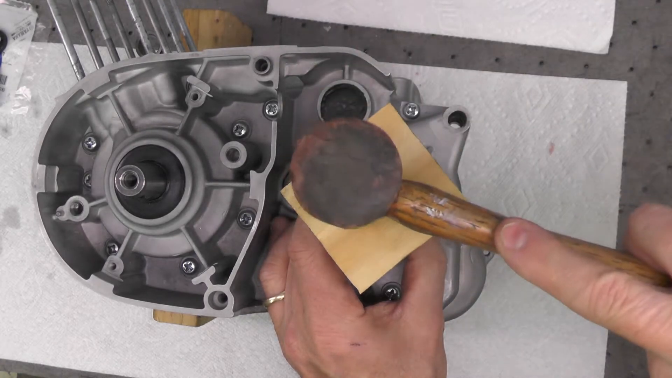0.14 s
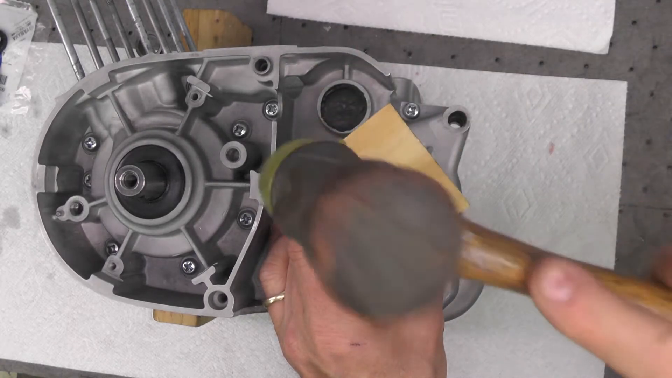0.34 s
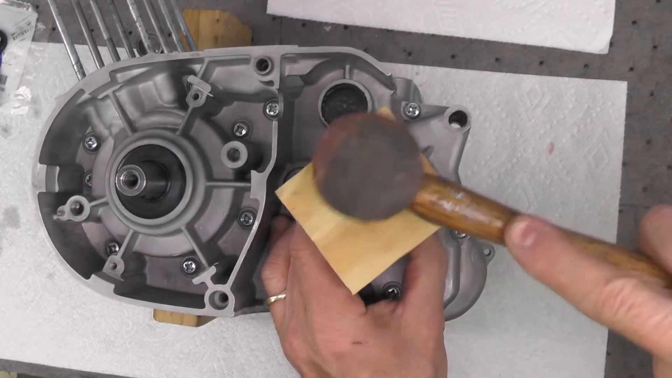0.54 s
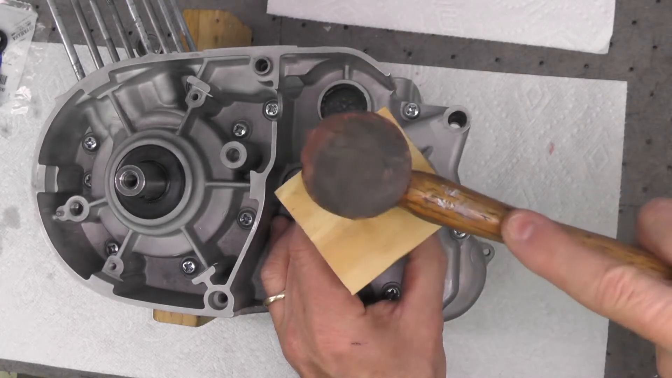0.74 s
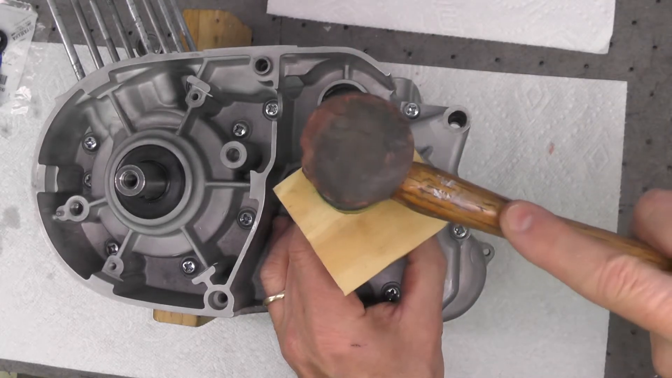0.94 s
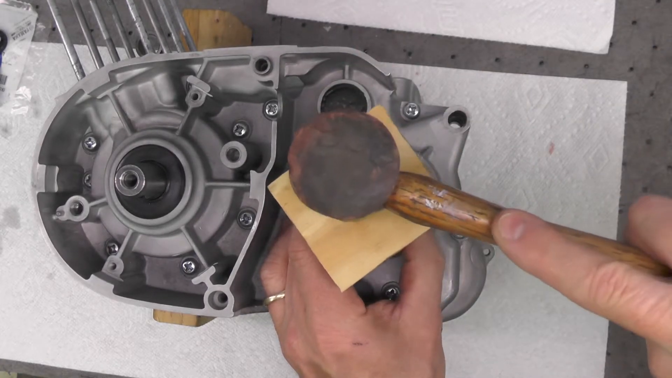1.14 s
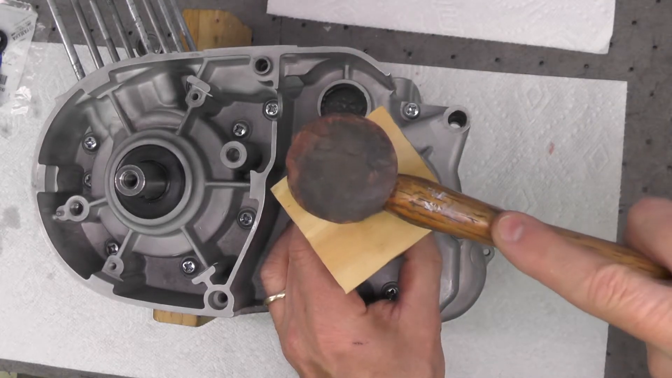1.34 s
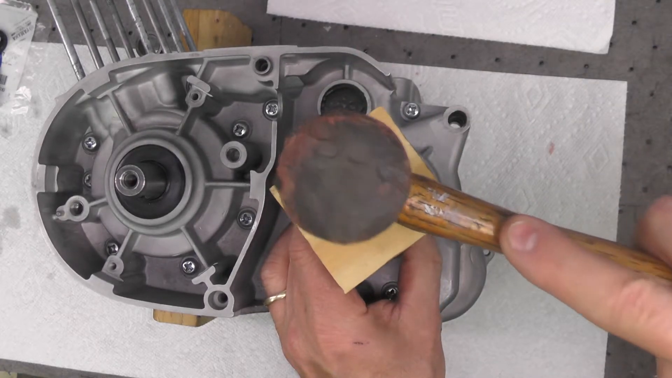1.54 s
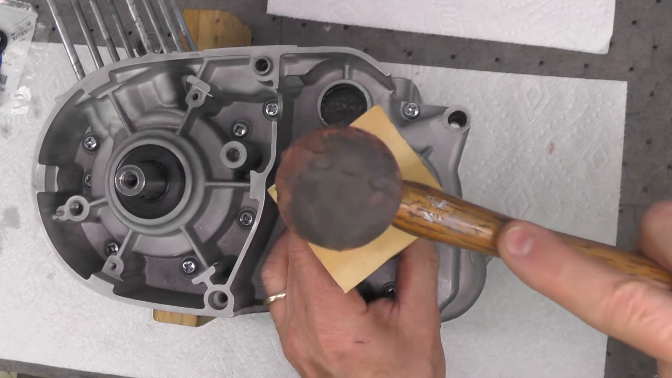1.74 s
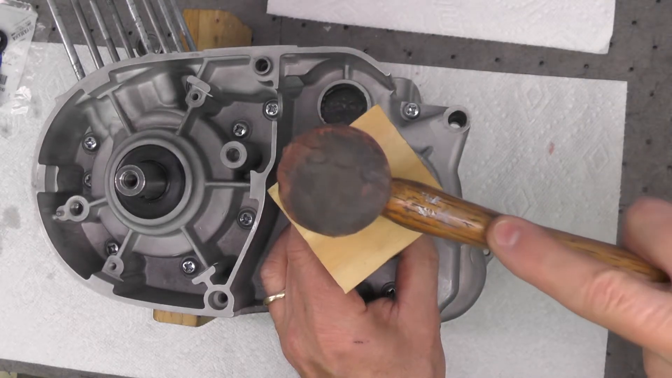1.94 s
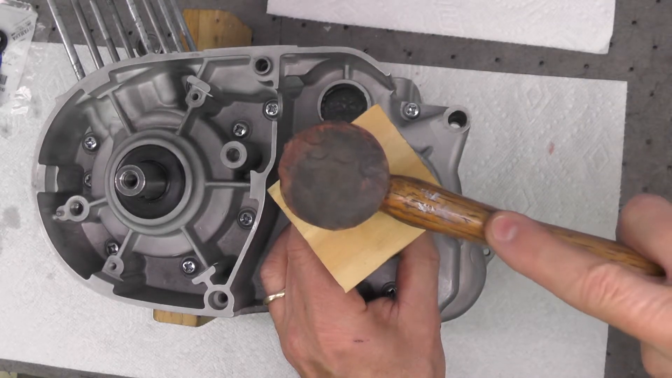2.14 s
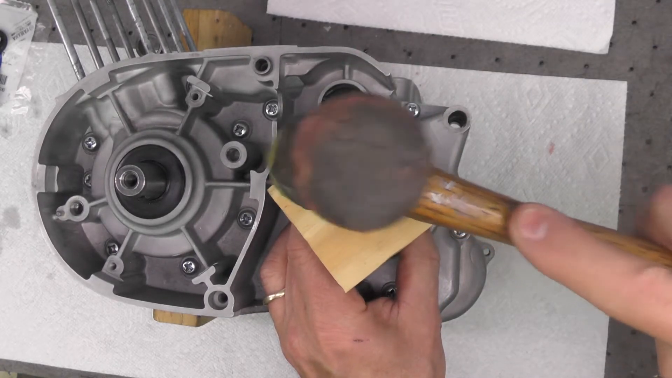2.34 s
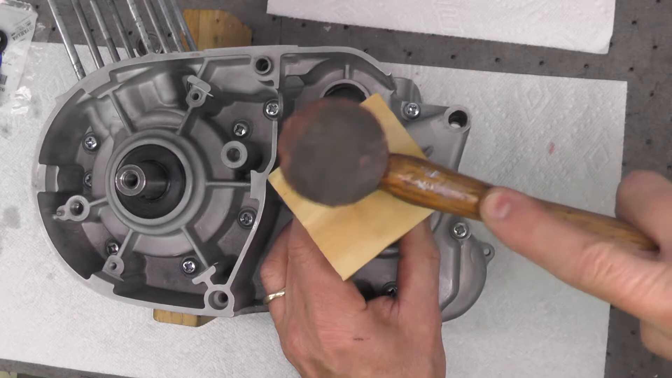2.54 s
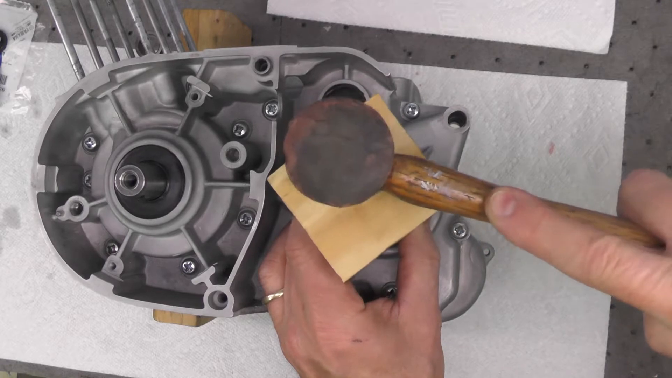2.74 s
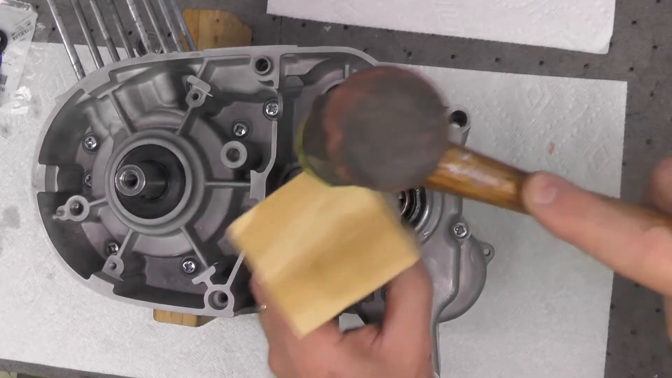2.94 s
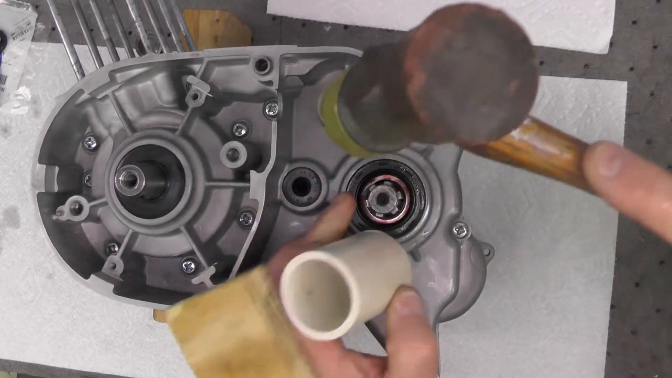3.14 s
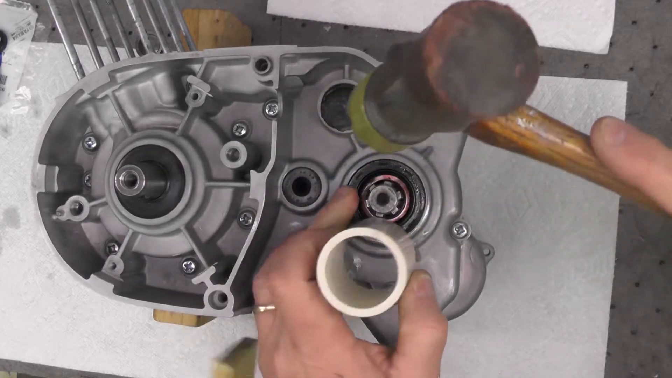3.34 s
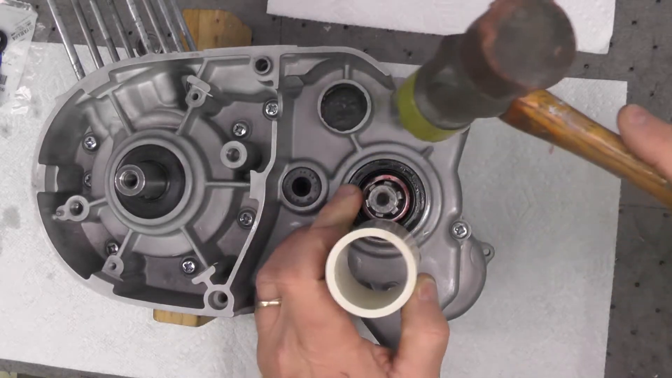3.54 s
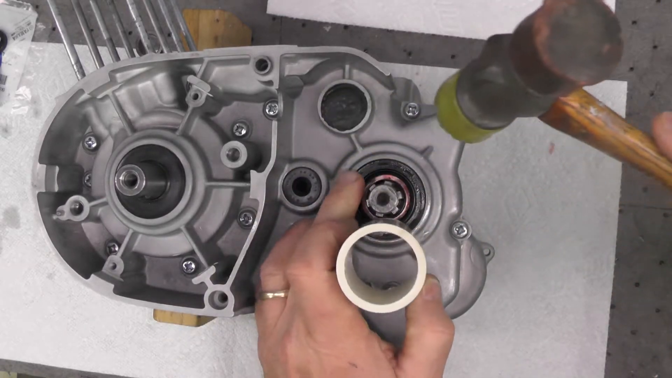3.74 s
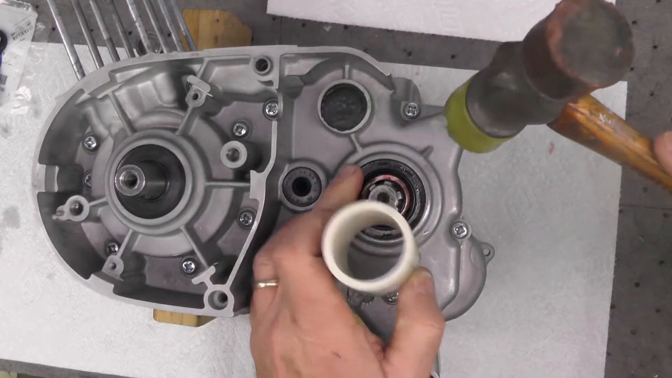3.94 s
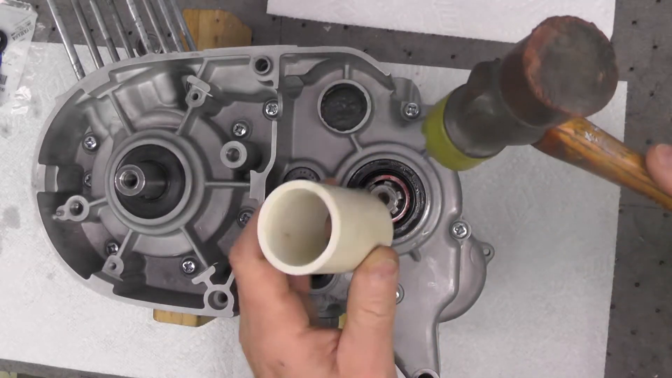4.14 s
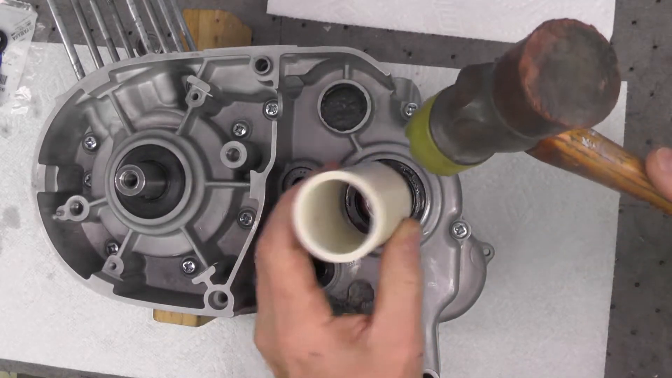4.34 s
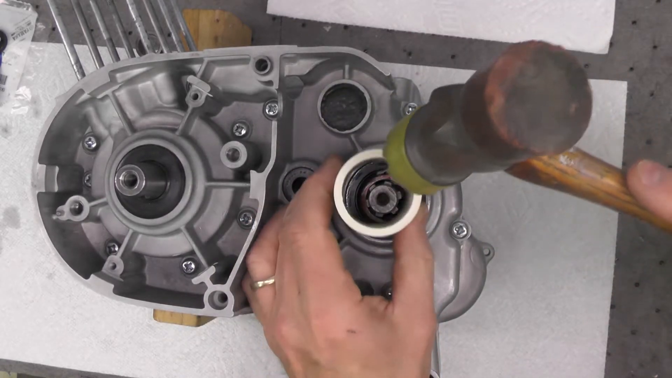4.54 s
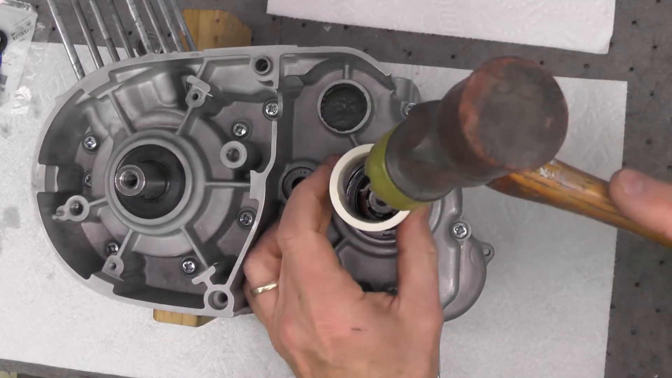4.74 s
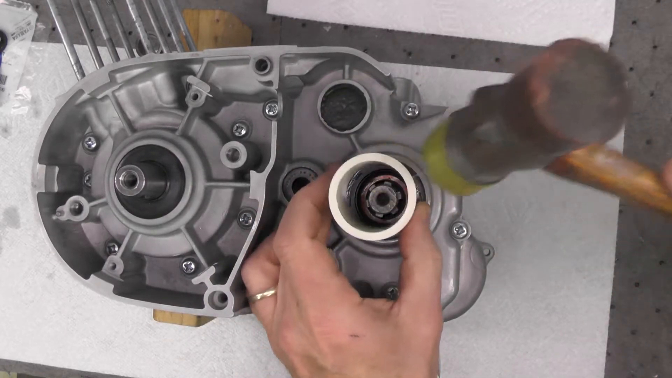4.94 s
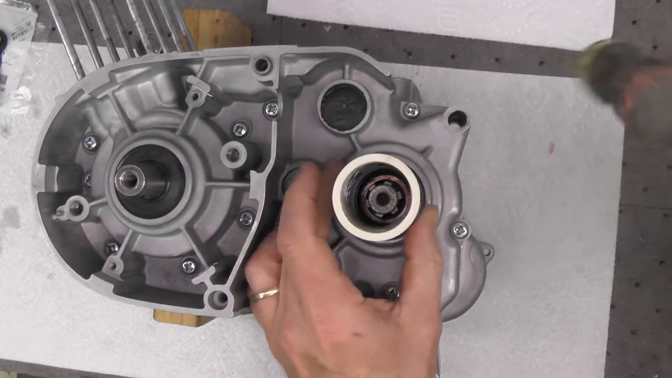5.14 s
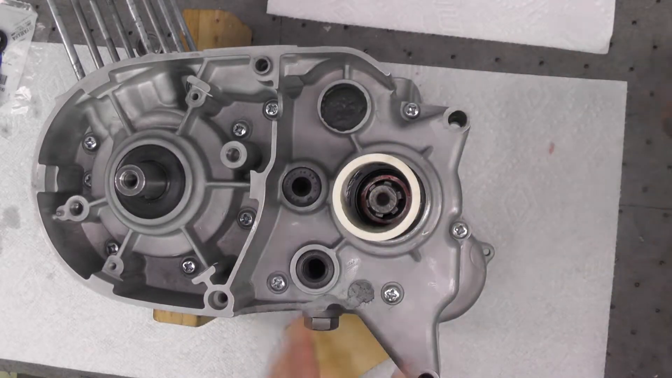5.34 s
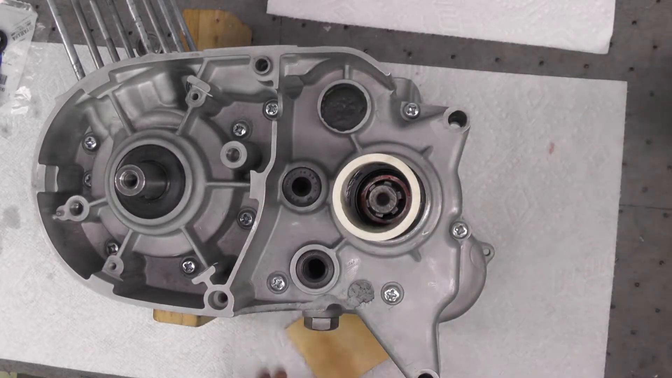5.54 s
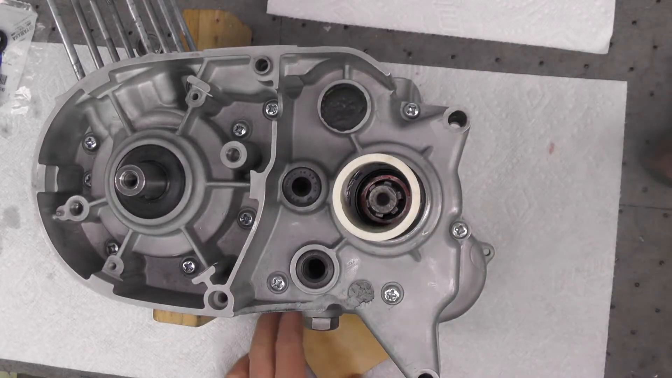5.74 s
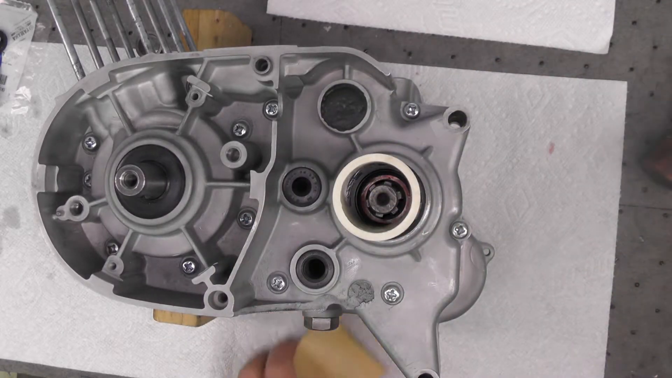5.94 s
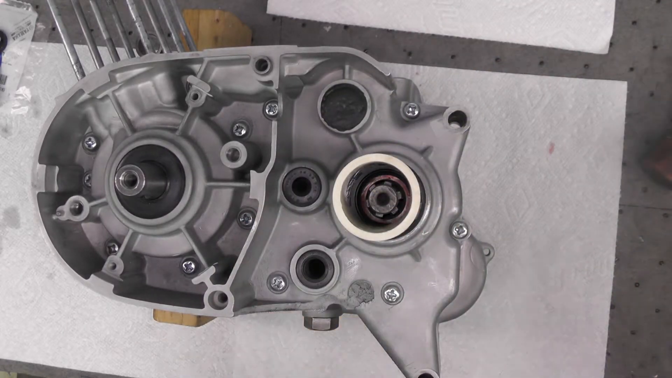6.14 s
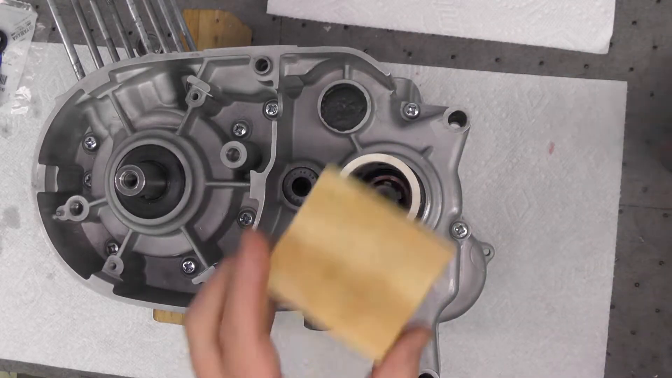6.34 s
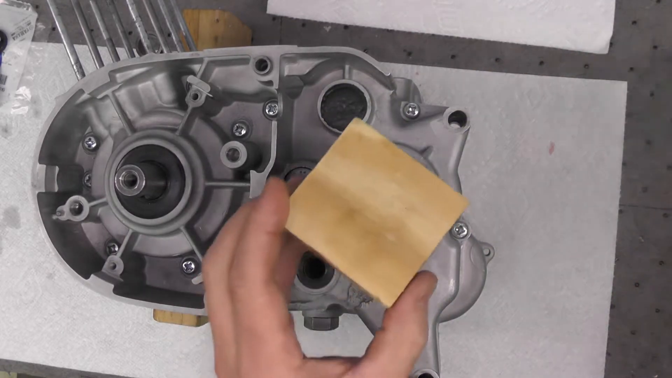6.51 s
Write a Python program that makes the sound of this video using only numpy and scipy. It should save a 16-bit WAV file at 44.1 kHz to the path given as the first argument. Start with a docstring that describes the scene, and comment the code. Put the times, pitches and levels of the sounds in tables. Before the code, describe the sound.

In a workshop, a mallet taps a wood block resting on a plastic pipe, then strikes hard, making a metal engine case ring and the bench boom. Several lighter taps lead to a second hard blow. The block scrapes off, clacks against the bench and slaps onto the floor. Small clicks, faint rubbing and a dull knock follow. The sounds are close, with a short room echo, over a quiet hum and faint clock ticking.

```python
"""A mallet drives a seal into an aluminium engine case through a wood block and a plastic pipe.
Light aiming taps come before two hard blows: the seal slips in jerks, the case rings, the bench booms.
The block slides off the pipe, clips the bench and slaps onto the floor. The pipe clicks and hisses as
it is lifted and set back, the case rocks, and wood scuffs over paper.
Behind it all, a clock ticks over the hum of the workshop's air and motors."""
import sys
import numpy as np
from scipy import signal
from scipy.fft import rfft, irfft
from scipy.io import wavfile

SR = 44100
rng = np.random.default_rng(int(sys.argv[2]) if len(sys.argv) > 2 else 0)


def file_out(sig):
    """Save sig as 16-bit WAV at sys.argv[1]."""
    # one column per channel
    cols = np.atleast_2d(sig).T
    # limit, then scale
    lim = np.clip(cols, -1, 1)
    pcm = np.round(lim * 32767).astype(np.int16)
    wavfile.write(sys.argv[1], SR, pcm)


N = 289945
T = np.arange(2 ** 15) / SR  # the time one hit lasts, in seconds
HZ = np.fft.rfftfreq(len(T), 1 / SR)  # the frequencies in one hit

# hollow notes of the block and pipe: f/Hz, level/dB, t60/s (the time to fade by 60 dB)
STACK_NOTES = [(411, -27.5, 0.046), (654, -39.5, 0.081), (785, -39, 0.11), (1340, -29, 0.019),
               (1612, -29.5, 0.024), (2620, -32, 0.026), (3560, -39.5, 0.032)]


def amp(db):
    """Turns decibels into a gain."""
    return 10 ** (np.asarray(db) / 20)


def read(points, hz=HZ):
    """Reads between the rows of a table, on a scale of octaves."""
    f, value = np.transpose(points)
    return np.interp(np.log(hz + 1), np.log(f + 1), value)


def add(mix, s, sound):
    """Lays a sound into the mix at s seconds."""
    part = mix[:, max(round(s * SR), 0):][:, :sound.shape[-1]]
    part += sound[..., :part.shape[1]]


def noise(gain_db, side_db, size=len(T)):
    """Noise with a chosen tone; a higher side_db makes left and right less alike."""
    # left-right difference, before side_db is added: f/Hz, level/dB
    width = [(60, -17), (110, -18.5), (200, -10), (380, -16), (700, -12.5), (1290, -14.5), (2380, -18),
             (4400, -19), (8120, -12.5), (15000, -5.5)]
    hz = np.fft.rfftfreq(size, 1 / SR)
    spectra = rfft(rng.standard_normal((2, size))) * amp(gain_db)
    mid = irfft(spectra[0], size)
    side = irfft(spectra[1] * amp(side_db + read(width, hz)), size)
    return mid + np.array([side, -side])


def fade(t60, rise=.0002):
    """Swells over about rise seconds and dies by 60 dB in t60 seconds."""
    return amp(-60 * T / t60) * (1 - np.exp(-T / rise))


def ring(notes, rise=.0001):
    """The fading notes of a struck object; neighbours start in opposite directions."""
    return sum((-1) ** k * amp(db) * fade(t60, rise) * np.sin(2 * np.pi * hz * T)
               for k, (hz, db, t60) in enumerate(notes))


def burst(tone, t60, rise=.0002):
    """Notes too crowded to tell apart, dying together; tone lists f/Hz, level/dB."""
    return noise(read(tone), side_db=-2) * fade(t60, rise)


def room(gain_db, rise):
    """The walls return a wide wash of echoes; the treble dies first."""
    # how long the echoes last: f/Hz, t60/s
    echo_times = [(90, 0.54), (250, .65), (600, 0.71), (1500, 0.68), (4000, 0.69), (6000, 0.54),
                  (8000, .36), (12000, 0.085), (16000, .2)]
    hz, t, spectra = signal.stft(noise(gain_db, side_db=5), SR, nperseg=256)
    decay = amp(-60 * t / read(echo_times, hz)[:, None])
    tail = signal.istft(spectra * decay, SR, nperseg=256)[1][:, :len(T)]
    return tail * (1 - np.exp(-T / rise))


def workshop_hum():
    """Moving air rushes, and motors hum with a slightly wandering pitch."""
    # ventilation: f/Hz, level/dB
    air_tone = [(25, -55), (150, -56), (310, -50), (520, -54.5), (780, -55), (910, -61), (1250, -55),
                (1600, -63.5), (1950, -61), (2400, -65.5), (3000, -62.5), (4700, -65), (6600, -74),
                (15500, -74)]
    # motor notes: f/Hz, level/dB (rms)
    motors = [(106.5, -68), (120, -66), (246.8, -73.5), (333, -81.5), (1266, -80), (1911, -84)]
    t = np.arange(N) / SR
    out = noise(read(air_tone, np.fft.rfftfreq(N, 1 / SR)), side_db=0, size=N)
    for hz, db in motors:
        waver = np.interp(t, np.linspace(0, t[-1], 40), rng.standard_normal(40))
        turns = np.cumsum(hz * (1 + .0035 * waver)) / SR + rng.random()
        out += np.sqrt(2) * amp(db) * np.sin(2 * np.pi * turns)
    return out


def aiming_taps():
    """The mallet taps and rests on the block, cutting the ringing short; slower contact is duller."""
    # taps: t/s, level/dB, treble cutoff/Hz, bench thump/dB
    taps = [(.0005, -3, 1097, -34), (1.205, -19, 750, -62), (1.332, -16.5, 650, -43.5),
            (1.845, -7.5, 480, -58), (2.183, 0.5, 3200, -32), (2.2199, -9.5, 1604, -50)]
    # air ringing on in the pipe: f/Hz, level/dB, t60/s
    pipe_air = [(424, -33, .12)]
    # a tap's echo: f/Hz, level/dB
    echo_tone = [(100, -39.5), (400, -33), (1000, -49), (1650, -39), (2100, -53), (2650, -43.5),
                 (3200, -55.5), (12000, -78.5)]
    contact_tone = [(40, -45), (250, -23), (1500, -19.5), (4000, -30), (7000, -40), (14000, -35)]
    out = np.zeros((2, N))
    for s, db, cutoff_hz, thump_db in taps:
        tap = burst(contact_tone, t60=.027) - ring(STACK_NOTES) - ring(pipe_air, rise=.0078)
        echo = room(read(echo_tone), rise=.0039)
        treble_cut = signal.butter(2, cutoff_hz, fs=SR, output="sos")
        add(out, s, amp(db) * signal.sosfilt(treble_cut, tap + echo))
        add(out, s + .0022, amp(thump_db) * bench_thump(rise=.0023) * fade(t60=.21))
    return out


def bench_thump(rise):
    """The bench booms; waves caught between the walls make left and right differ."""
    # bench notes, of which the close pair swells, then cancels: f/Hz, level/dB, t60/s
    bench_notes = [(86.8, 3.5, 0.36), (94.5, 3.5, .28), (126, -7.5, .22), (159, -7.5, 0.13)]
    # the boom in the room: f/Hz, level/dB
    spread_tone = [(30, -20), (60, -6), (90, 8), (130, -2), (220, -25), (500, -70)]
    spread = noise(read(spread_tone), side_db=0)[0] * fade(t60=.45, rise=.008)
    return ring(bench_notes, rise) + np.array([spread, -spread])


def clock():
    """A distant clock steps once a second with a double tick."""
    # one tick: f/Hz, level/dB
    tick_tone = [(1500, -73), (2400, -54), (3000, -47), (4800, -48.5), (6500, -59.5), (9000, -70),
                 (14000, -78)]
    out = np.zeros((2, N))
    for second in range(int(N / SR) + 1):
        for s, db in [(.288, .14), (.306, -1.1)]:
            add(out, second + s, amp(db) * burst(tick_tone, t60=.09, rise=.0013))
    return out


def slipping_seal(gap):
    """The seal breaks free, slips in weaker jerks, and the mallet falls back: delay/s, level/dB."""
    break_free, rebound = (.00054, 3), (.036, -13.5)
    return [break_free] + [(k * gap, -3.5) for k in (1, 2, 3)] + [rebound]


def hard_blows():
    """The seal cracks forward, the case rings, the bench bounces and the room answers."""
    # blows: t/s, level/dB, gap between jerks/s, bright ring in the echo/Hz, bench thump/dB, ringing/dB
    blows = [(0.5606, .5, .0054, 4400, -17.5, -1.5), (2.5475, 0, .0041, 4690, -14.5, -2.5)]
    # one jerk of the seal: f/Hz, level/dB
    crack_tone = [(40, -8), (200, -4), (420, 0), (760, -6), (980, -16), (1400, -5), (2050, -14), (3100, -1),
                  (5000, -2), (7500, -10), (12000, -5), (15500, -9)]
    # the case's clear notes: f/Hz, level/dB, t60/s
    case_notes = [(381, -28.5, 0.32), (420.5, -19, 0.23), (506, -28.5, 0.41), (566, -30, 0.54),
                  (725.6, -28.5, 0.14), (1268, -30.5, 0.36), (2998, -37, 0.46), (3285, -34.5, .4),
                  (3540, -34, 0.34), (3900, -34.5, 0.46), (4390, -35, 0.55), (4280, -35, 0.45),
                  (5160, -36, .4), (5700, -39, .4), (11850, -37, 0.38), (14800, -34.5, .24)]
    # the case's crowded notes: f/Hz, level/dB
    shimmer_tone = [(200, -10.5), (450, -11.5), (1000, -25), (1450, -12.5), (2050, -20.5), (3200, -9),
                    (7000, -17), (12000, -20), (15500, -26)]
    # a blow's echo: f/Hz, level/dB
    echo_tone = [(60, -17), (155, -7), (200, -17), (330, -2), (700, -11), (950, -24), (1400, -17),
                 (2000, -29.5), (3000, -18), (5000, -20.5), (7000, -19.5), (10000, -23.5), (15000, -36)]
    out = np.zeros((2, N))
    # the case's many high notes put peaks and dips in the treble, alike for every blow
    grid_hz = np.arange(0, SR / 2, 40)
    ripple_db = 7 * np.interp(HZ, grid_hz, rng.uniform(-1.05, .9, len(grid_hz))) * (HZ > 2400)
    for s, db, gap, bright_hz, thump_db, ring_db in blows:
        for delay, jerk_db in slipping_seal(gap):
            add(out, s + delay, amp(db + jerk_db) * burst(crack_tone, t60=.025))
        shimmer = noise(read(shimmer_tone) + ripple_db, side_db=2) * fade(t60=.23, rise=.006)
        metal = amp(ring_db) * (shimmer + ring(case_notes, rise=.0024))
        bright_db = 7 * np.exp(-(np.log2((HZ + 1) / bright_hz) / .25) ** 2)
        echo = room(read(echo_tone) + bright_db + ripple_db, rise=.0098)
        add(out, s, amp(db) * (metal + echo))
        add(out, s, amp(thump_db) * bench_thump(rise=.002))
    return out


def click():
    """A light touch on the case, with a hollow knock under it."""
    # the touch: f/Hz, level/dB
    click_tone = [(200, -43), (800, -31), (1500, -25), (2200, -38), (3200, -31), (7500, -45), (9400, -31),
                  (11000, -51.5), (15000, -47)]
    touch = burst(click_tone, t60=.048)
    echo = room(read(click_tone) - 26, rise=.0043)
    return touch + echo + amp(-19) * ring(STACK_NOTES)


def turning_pipe(start_s=2.85, end_s=4.5, ticks_per_s=1.6):
    """The pipe ticks faintly and unevenly as the fingers turn it."""
    out, tick = np.zeros((2, N)), click()
    for s in np.arange(start_s, end_s, 1 / ticks_per_s):
        add(out, s + rng.uniform(0, .5) / ticks_per_s, amp(-22.5) * tick)
    return out


def rub(tone, length, side_db):
    """One sliding stroke: the hiss swells and falls with the pressure, roughened by an uneven grip."""
    pressure = np.sin(np.pi * np.minimum(T / length, 1))
    grip_times = T[::300]
    grip_db = 2.5 * np.interp(T, grip_times, rng.standard_normal(len(grip_times)))
    return pressure * amp(grip_db) * noise(read(tone), side_db)


def sliding_pipe():
    """The pipe hisses as it slides under the fingers."""
    # strokes: t/s, length/s, level/dB
    strokes = [(3.089, 0.17, 3.5), (4.093, 0.085, 3.5), (4.219, 0.057, -2.5), (4.507, 0.062, 1.5)]
    # skin on plastic: f/Hz, level/dB
    hiss_tone = [(800, -72), (2800, -62), (5600, -69), (6050, -52), (6500, -70), (7200, -59), (8000, -71),
                 (9000, -67), (9500, -55), (9900, -65), (10400, -55), (11000, -69), (12200, -63),
                 (15500, -68)]
    out = np.zeros((2, N))
    for s, length, db in strokes:
        add(out, s, amp(db) * rub(hiss_tone, length, side_db=-4.5))
    return out


def sliding_block():
    """The block scrapes off the pipe's rim."""
    # wood on plastic: f/Hz, level/dB
    scrape_tone = [(500, -55), (800, -36.5), (950, -50), (1270, -33), (1800, -60), (2750, -58), (3400, -55),
                   (6000, -69)]
    out = np.zeros((2, N))
    add(out, 3.095, amp(-2) * rub(scrape_tone, length=.11, side_db=-18))
    return out


def case_clicks():
    """The pipe or the wood clicks against the case."""
    # touches: t/s, level/dB
    touches = [(3.193, -15), (3.319, -12), (4.0761, -2.5), (4.546, -12), (5.845, -18)]
    out = np.zeros((2, N))
    for s, db in touches:
        add(out, s, amp(db) * click())
    return out


def block_clips_bench():
    """The falling block hits the bench edge with a bright clack."""
    # the block struck on its edge: f/Hz, level/dB, t60/s
    block_notes = [(800, -36, 0.077), (1260, -22, 0.024), (1534, -21.5, 0.023), (3085, -38, 0.058),
                   (4300, -33, 0.012), (6060, -42, 0.058)]
    # the clack's echo: f/Hz, level/dB
    echo_tone = [(200, -56), (800, -48), (1400, -36.5), (2300, -45), (4500, -47.5), (6800, -44),
                 (10000, -58), (15000, -73)]
    clack_tone = [(100, -24), (500, -26), (1300, -14.5), (2400, -20.5), (4200, -23.5), (9000, -33),
                  (12000, -32), (15000, -57)]
    out = np.zeros((2, N))
    clack = burst(clack_tone, t60=.033) - ring(block_notes)
    add(out, 3.2533, clack + room(read(echo_tone), rise=.003))
    return out


def block_hits_floor(land_s=3.4735):
    """The block lands corner by corner, with a hollow slap that fills the room."""
    # corners touching down: delay/s, level/dB
    corners = [(0, -5.5), (.002, 3.5), (.0045, -1.5)]
    # the block landing flat: f/Hz, level/dB, t60/s
    block_notes = [(71, -29, 0.061), (195, -22.5, 0.064), (393.7, -14.5, 0.057), (758, -12, .04),
                   (1250, -16.5, 0.045)]
    # the floor under it: f/Hz, level/dB, t60/s
    floor_notes = [(246, -24, .15), (309, -28, .35), (385.8, -24, .25)]
    # the slap's echo: f/Hz, level/dB
    echo_tone = [(60, -32), (150, -18.5), (300, -5.5), (480, -9), (750, -12.5), (1000, -20.5),
                 (1300, -20.5), (2000, -36), (3600, -39), (8000, -56), (15000, -57.5)]
    slap_tone = [(40, 1), (150, -10.5), (800, 1), (1500, -9), (2500, -19), (5000, -30.5), (8000, -37),
                 (13000, -35.5), (15500, -49)]
    out = np.zeros((2, N))
    for delay, db in corners:
        add(out, land_s + delay, amp(db) * burst(slap_tone, t60=.029))
    ringing = amp(7) * ring(block_notes, rise=.003) + ring(floor_notes, rise=.012)
    add(out, land_s + .0013, ringing + room(read(echo_tone), rise=.0038))
    return out


def rocking_case():
    """The case rocks on its supports, knocking and shaking the bench."""
    # bumps: t/s, bench thump/dB, knock/dB
    bumps = [(3.774, -53.5, -21.5), (4.584, -57, -52), (5.636, -39, -37), (5.844, -33, -9)]
    # one dull knock: f/Hz, level/dB
    knock_tone = [(40, -46), (90, -56), (170, -13), (280, -6.5), (480, -23), (700, -53), (2000, -47.5),
                  (12000, -70)]
    out = np.zeros((2, N))
    for s, thump_db, knock_db in bumps:
        add(out, s, amp(thump_db) * bench_thump(rise=.0028))
        add(out, s, amp(knock_db) * burst(knock_tone, t60=.42, rise=.0015))
    return out


def paper_scuffs():
    """The block is dragged over the paper on the bench."""
    # strokes: t/s, length/s, level/dB
    strokes = [(5.755, 0.093, -3), (5.901, .075, 1.5)]
    # wood on paper: f/Hz, level/dB
    paper_tone = [(800, -66), (2000, -63), (2800, -51.5), (5000, -61), (7000, -67), (11000, -66),
                  (15500, -70)]
    out = np.zeros((2, N))
    for s, length, db in strokes:
        add(out, s, amp(db) * rub(paper_tone, length, side_db=-7))
    return out


def scene():
    """All the sounds together, a touch to the right."""
    mix = hard_blows() + aiming_taps() + block_clips_bench() + block_hits_floor()
    mix += rocking_case() + case_clicks() + sliding_pipe() + paper_scuffs() + sliding_block()
    mix += clock() + workshop_hum() + turning_pipe()
    return mix * amp([[-.15], [.15]])


def record(dry):
    """Rounds off the loudest peaks, then removes the very highest treble."""
    ceiling, cutoff_hz = .8, 16100
    rounded = dry / (1 + (dry / ceiling) ** 4) ** .25
    treble_cut = signal.firwin(511, cutoff_hz, window=("kaiser", 9), fs=SR)
    return signal.oaconvolve(rounded, treble_cut[None], "same")


dry = scene()
out = record(dry)
file_out(out)
```